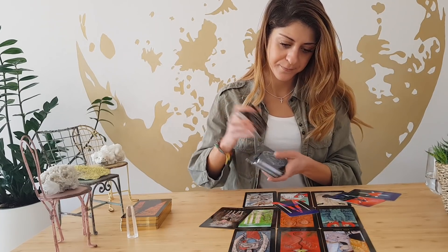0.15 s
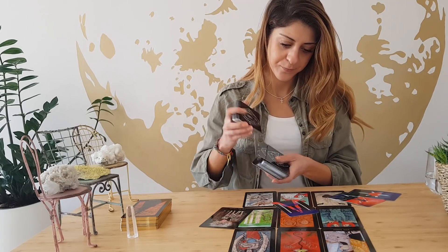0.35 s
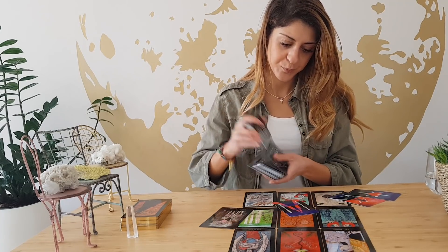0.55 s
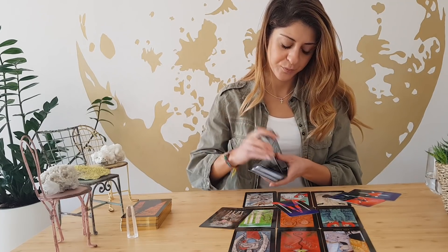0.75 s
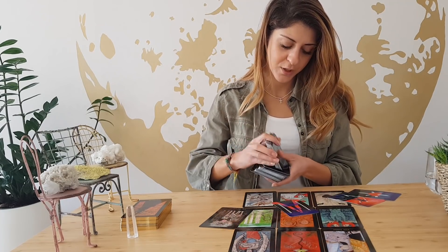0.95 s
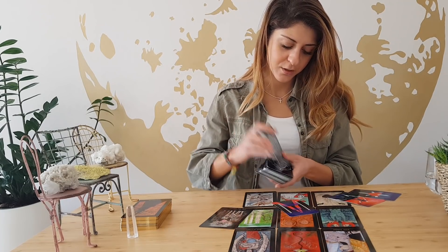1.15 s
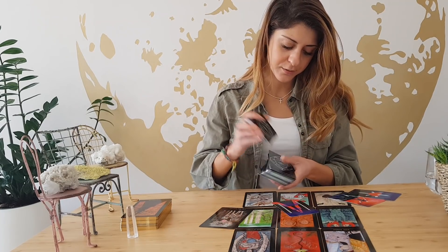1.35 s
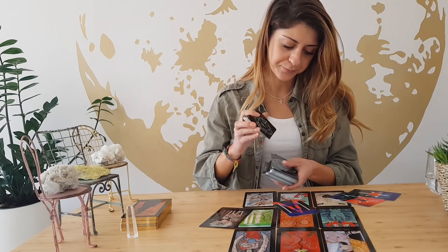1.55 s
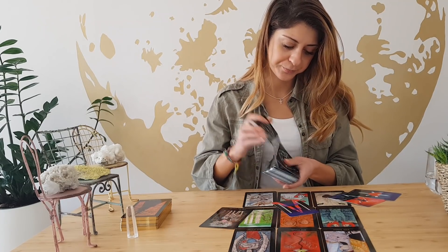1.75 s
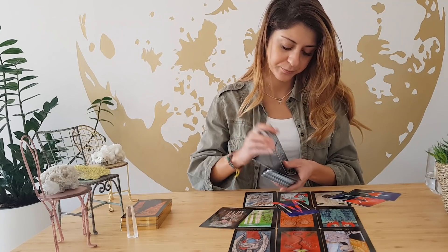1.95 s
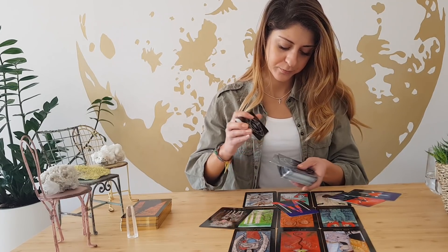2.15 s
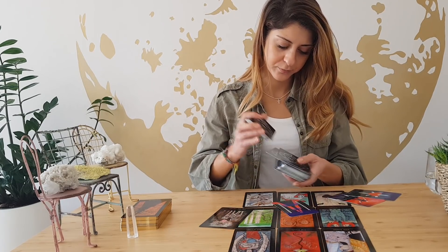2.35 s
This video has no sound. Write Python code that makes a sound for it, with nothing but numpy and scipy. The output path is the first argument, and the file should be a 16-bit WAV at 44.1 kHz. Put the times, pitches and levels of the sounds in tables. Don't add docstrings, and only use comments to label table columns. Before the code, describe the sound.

Hand shuffling of playing cards, quick sliding flicks and light clacks in a bare, echoing room

```python
import sys
import numpy as np
from scipy import signal
from scipy.fft import rfft, irfft
from scipy.io import wavfile
from scipy.ndimage import uniform_filter1d

SR = 44100
rng = np.random.default_rng(int(sys.argv[2]) if len(sys.argv) > 2 else 0)


def log_audio(samples):
    frames = np.atleast_2d(samples).T
    limited = np.clip(frames, -1, 1)
    pcm = np.round(limited * 32767).astype(np.int16)
    wavfile.write(sys.argv[1], SR, pcm)


def boost(x):
    u = np.asarray(x, float) / 20
    return 10 ** u


N = 105840
LEAD_S = 0.06


def evened(x):
    return x / np.sqrt(np.sum(x ** 2) + 1e-20)


def read(points, hz):
    f, value = np.transpose(points)
    return np.interp(np.log(hz + 1), np.log(f + 1), value)


def add(mix, s, sound):
    start = max(round((s + LEAD_S) * SR), 0)
    part = mix[start:][:len(sound)]
    part += sound[:len(part)]


# (frequency [Hz], left-right correlation [-1 to 1])
PORT_LIKENESS = [(40, .98), (130, 0.95), (290, 0.7), (640, 0.3), (1410, -0.43), (3100, 0.35), (6820, -0.41),
                 (15000, 0.)]
# (frequency [Hz], left minus right [dB])
PORT_BALANCE = [(60, -4), (110, 5.5), (200, -3), (380, 2), (700, 3), (1290, 0.5), (2380, 2), (4400, 1.5),
                (8120, 1), (15000, -3)]


def pair(z, hz):
    same = np.clip(read(PORT_LIKENESS, hz), -1, 1)[:, None]
    lean = boost(read(PORT_BALANCE, hz) / 2)[:, None]
    left = z[0] * lean
    right = (same * z[0] + np.sqrt(1 - same ** 2) * z[1]) / lean
    return np.array([left, right])


# (frequency [Hz], density [dB per Hz])
AIR_SPECTRUM = [(20, -17), (33, -13), (45, 1), (62, -14), (82, 1), (125, -20), (170, -21.5), (450, -32),
                (8000, -37), (16000, -33)]
AIR_DB = -64.5


def air():
    real, imag = rng.standard_normal((N // 2048 + 5, 4097, 2, 2)).T
    hz = np.fft.rfftfreq(8192, 1 / SR)
    spectrum = pair(real + 1j * imag, hz) * boost(read(AIR_SPECTRUM, hz))[:, None]
    tone = signal.istft(spectrum, nperseg=8192, noverlap=6144)[1][:, :N]
    return boost(AIR_DB) * evened(tone) * np.sqrt(2 * N)


def flattened(x, size):
    z = rfft(np.roll(x, 128))
    local_power = uniform_filter1d(abs(z) ** 2, size=size)
    return evened(irfft(z / np.sqrt(local_power + 1e-12)))


# (frequency [Hz], density [dB per Hz])
CARD_SPECTRUM = [(120, -48.5), (200, -15.5), (289, -12.5), (933, -7.5), (1480, -3.5), (4680, -6),
                 (7830, -11), (12600, -12.5), (16000, -22)]


def colour(body_db, edge_db, treble_db, size=2048):
    hz = abs(np.fft.fftfreq(size, 1 / SR))
    tilt = read([(700, body_db), (1300, 0), (2200, 0.0092), (3000, edge_db), (5000, edge_db),
                 (7000, treble_db)], hz)
    log_gain = np.log(boost(read(CARD_SPECTRUM, hz) + tilt) + 1e-5)
    phase = -signal.hilbert(log_gain).imag
    response = np.fft.ifft(np.exp(log_gain + 1j * phase)).real
    return evened(response[:size // 2])


# (time [s], peak [dB], body [dB], treble [dB], length [s])
SLIDE_EVENTS = [(-.05, -28, 10, -1.5, 0.023), (0.016, -34, 4, -2, .03), (0.068, -25, 0.5, 1, 0.024),
                (0.265, -23, -7, -10, 0.044), (0.343, -24.5, -2, -5, 0.024), (0.586, -24, -2, -1, 0.016),
                (0.738, -28.5, 4, 20, 0.019), (.785, -55, -7, -1, .03), (0.822, -17.5, 4, 4, 0.0087),
                (0.921, -37.5, -9, 4, 0.025), (0.997, -35.5, 10, 5, 0.034), (1.069, -22.5, 4.5, 5, 0.018),
                (1.201, -30, 3.5, -3.5, 0.043), (1.299, -25.5, -6, 4.5, 0.017),
                (1.455, -27.5, -11, -1, 0.027), (1.532, -21, 4.5, 2, 0.019), (1.677, -29, -5.5, 2, 0.026),
                (1.784, -24.5, 3, 5, 0.029), (1.855, -22.5, 3, -2, 0.065), (1.905, -30.5, 15.5, 6.5, 0.019),
                (1.937, -27, 1.5, -2.5, 0.032), (2.002, -25.5, -4, 1, 0.032)]
SLIDE_DB = 5
GRIT_PER_S, GRIT_DB = 2600, 3


def slide(start, db, body_db, treble_db, length):
    u = np.arange(8192) / SR / max(length, 0.003)
    chance, size, sign = rng.random((8192, 3)).T
    contacts = (chance < GRIT_PER_S / SR) * (sign - 0.5)
    sizes = boost(-GRIT_DB * np.log(size + 0.024))
    stroke = u ** 1.2 * np.exp(-4.0 * u)
    grit = flattened(contacts * sizes * stroke, size=40)
    sound = signal.fftconvolve(grit, colour(body_db, 0, treble_db))
    return start - 128 / SR, boost(db + SLIDE_DB) * sound


# (time [s], peak [dB], frequency [Hz], duration [cycles])
THUD_EVENTS = [(-.03, -62, 195, 2.5), (0.029, -48, 465, 5.1), (0.082, -46, 178, 1.35),
               (0.359, -41, 256, 0.63), (0.589, -41, 375, 2), (0.64, -55, 159, 1.7),
               (0.743, -43.5, 436, 3.8), (.822, -27, 870, 0.96), (0.823, -40.5, 414, 4.5),
               (.830, -51, 130, 1.13), (1.091, -46, 133, 1.5), (1.114, -41, 265, 4.3),
               (1.127, -55.5, 290, 4.5), (1.218, -53, 134, 2.1), (1.310, -40, 610, 1.9),
               (1.315, -53, 130, 1.2), (1.545, -39.5, 390, 1.1), (1.784, -43.5, 155, 1.5),
               (1.864, -36, 443, 2.7), (1.901, -43, 310, 2.1), (1.920, -43, 265, 3.5),
               (1.945, -43.5, 370, 1.8), (2.009, -46, 380, 2.8), (2.038, -52.5, 100, 1.2)]
THUD_DB = -2


def thud(start, db, hz, cycles):
    u = np.arange(4096) / SR * hz / cycles
    push = u * np.exp(2 - 4.85 * u)
    return start, boost(db + THUD_DB) * np.sin(2 * np.pi * cycles * u) * push


# (time [s], peak [dB], frequency [Hz])
POP_EVENTS = [(0.083, -48, 1710), (.084, -46, 667), (.254, -29.5, 1244), (0.255, -29, 2300),
              (0.255, -29.5, 1415), (0.258, -26.5, 4270), (0.356, -29, 2900), (0.513, -38.5, 2760),
              (.593, -43, 647), (0.593, -40, 1585), (0.742, -34, 1300), (0.749, -33, 2660),
              (0.824, -25.5, 1330), (.824, -31.5, 855), (.826, -37, 660), (.828, -35, 1036),
              (.980, -53, 700), (1.076, -36.5, 1670), (1.208, -37.5, 1514), (1.302, -36.5, 1510),
              (1.309, -37, 2840), (1.311, -31.5, 3860), (1.312, -32.5, 4660), (1.451, -26, 1530),
              (1.49, -26.5, 1564), (1.497, -28.5, 2580), (1.54, -29.5, 1404), (1.540, -39.5, 858),
              (1.541, -38, 2340), (1.709, -30.5, 1495), (1.725, -43.5, 3700), (1.782, -31, 1610),
              (1.785, -30, 1263), (1.800, -25.5, 1990), (1.857, -30, 2770), (1.906, -32, 1490),
              (2.021, -49, 1600)]
POP_Q = 9.3


def pop(start, db, hz):
    turn = np.arange(2048) / SR * hz
    swell = np.minimum(turn / 1.93, 1)
    return start, boost(db) * np.sin(2 * np.pi * turn) * swell * np.exp(-np.pi * turn / POP_Q)


# (time [s], peak [dB], body [dB], edge [dB], treble [dB])
SNAP_EVENTS = [(0.252, -25, -28, -10.5, -15.5), (0.354, -31, -20, -20, -22), (0.5122, -33, -20, -16.5, -22),
               (0.738, -34, -16.5, -17, -24), (0.98, -38, -26.5, -19, -18), (1.114, -37, -20.5, -21.5, -38),
               (1.451, -25.5, -31, -19, -27.5), (1.490, -25.5, -23, -19, -22.5),
               (1.688, -37, -23.5, -22.5, -23), (1.708, -34.5, -28.5, -23, -37),
               (1.782, -18.5, -27, -21, -27)]
SNAP_DB, SNAP_S = 1.5, 0.0011


def snap(start, db, body_db, edge_db, treble_db):
    strikes = rng.standard_normal(512) * np.exp(-np.arange(512) / SR / SNAP_S)
    blow = flattened(strikes, size=3)
    sound = np.convolve(blow, colour(body_db + 26, edge_db + 18.5, treble_db + 20))
    sound = np.pad(sound, (100, 0)) + 0.04 * np.pad(sound, (0, 100))
    return start - 180 / SR, boost(db + SNAP_DB) * sound / abs(sound).max()


# (time [s], peak [dB], body [dB], treble [dB])
BEAM_EVENTS = [
    (.2525, -25, -36, -26),
    (.5113, -29, -24, -34),
    (.8255, -30, -12, -22),
    (0.9805, -41, -26, -12),
    (1.1150, -34, -6, -44),
    (1.4900, -30, -26, -30),
    (1.5390, -33, -16, -32),
    (1.6800, -39, -34, -6),
]


def beam(start, db, body_db, treble_db):
    return snap(start, db, body_db, -15, treble_db)


# (time [s], peak [dB], frequency [Hz])
KNOCK_EVENTS = [(.3595, -33, 1490), (.2600, -30, 4300), (0.5120, -31, 2600), (0.5195, -38, 1490),
                (.6000, -32, 1570), (.8325, -26, 1320), (.8330, -29, 850), (.9345, -40, 1300),
                (1.0785, -31, 1640), (1.1240, -37, 270), (1.1420, -41, 255), (1.2150, -35, 1520),
                (1.3035, -30, 1520), (1.3150, -35, 4200), (1.3170, -34, 1520), (1.4585, -23, 1480),
                (1.4735, -33, 3800), (1.4985, -27, 1560), (1.5065, -29, 2750), (1.5490, -31, 1480),
                (1.7165, -29, 1480), (1.7330, -36, 3700), (1.789, -22, 1320), (1.8040, -28, 3700),
                (1.8100, -28, 2500), (1.8330, -30, 2100), (1.8630, -33, 2900), (1.9135, -34, 1460),
                (2.0240, -39, 1450)]


def knock(start, db, hz):
    return pop(start, db, hz)


# (frequency [Hz], decay time T60 [s])
REVERB_DECAY = [(100, 0.63), (260, 0.3), (700, 0.44), (1840, 0.34), (4850, 0.33), (12800, 0.23)]
# (delay [s], level [dB])
REFLECTIONS = [(0, 2.5), (.0022, -5), (.0045, -9), (.0075, -2), (.0092, -4), (.0150, -7), (.0170, -8),
               (.0230, -8), (.0250, -9), (.0310, -9)]
# (frequency [Hz], level [dB], decay time T60 [s])
STANDING_WAVES = [(130, -19, 0.64), (264.5, -25.5, 0.49)]
ROOM_DB, BUILD_S = 8.5, 0.013
SCATTER_S, ECHO_DULL = 0.0004, 0.45


def room(x, size=26460):
    t = np.arange(size) / SR
    taps = np.zeros((2, size))
    at = np.arange(0, size - 10, 10) + rng.integers(0, 10, (2, size // 10 - 1))
    np.put_along_axis(taps, at, rng.choice([-1., 1.], at.shape), 1)
    hz, frame_s, z = signal.stft(taps, SR, nperseg=512)
    decay = boost(-60 * frame_s / read(REVERB_DECAY, hz)[:, None])
    tail = signal.istft(pair(z * decay, hz), SR, nperseg=512)[1][:, :size]
    tail = boost(ROOM_DB) * evened(tail * (1 - np.exp(-t / BUILD_S))) * np.sqrt(2)
    for f, db, t60 in STANDING_WAVES:
        tail += boost(db - 60 * t / t60 - 22.5) * np.sin(2 * np.pi * f * t)
    for delay, db in REFLECTIONS:
        skew = rng.integers(0, 2 + round(delay * 500), 2)
        for ear, late in zip(tail, round(delay * SR) + skew):
            scatter = 0.7 * rng.standard_normal(64) + (t[:64] == 0) * 2
            scatter = scatter * np.exp(-t[:64] / SCATTER_S)
            scatter = signal.lfilter([1], [1, -ECHO_DULL * (delay > 0)], scatter)
            ear[late:late + 64] += boost(db) * evened(scatter)
    return signal.fftconvolve(x[None], tail, axes=1)


def scene():
    lead = round(LEAD_S * SR)
    paths = np.zeros((4, N + lead))
    sources = ((slide, SLIDE_EVENTS), (thud, THUD_EVENTS), (pop, POP_EVENTS), (snap, SNAP_EVENTS))
    for make, table in sources:
        for k, row in enumerate(table):
            add(paths[k % len(paths)], *make(*row))
    direct = np.zeros(N + lead)
    for make, table in ((beam, BEAM_EVENTS), (knock, KNOCK_EVENTS)):
        for row in table:
            add(direct, *make(*row))
    reverberant = sum(room(path)[:, lead:lead + N] for path in paths)
    return reverberant + direct[lead:] + air()


def top_cut(x):
    return signal.sosfilt(signal.butter(12, 16650, fs=SR, output="sos"), x)


def record(dry):
    edge = signal.firwin(1201, 16400, window=("kaiser", 8), fs=SR)
    mix = signal.oaconvolve(dry, edge[None], "same")
    return top_cut(mix)


dry = scene()
out = record(dry)
log_audio(out)
```